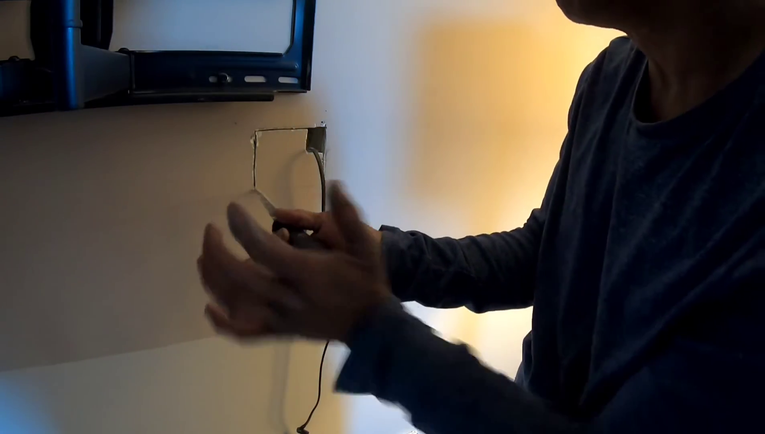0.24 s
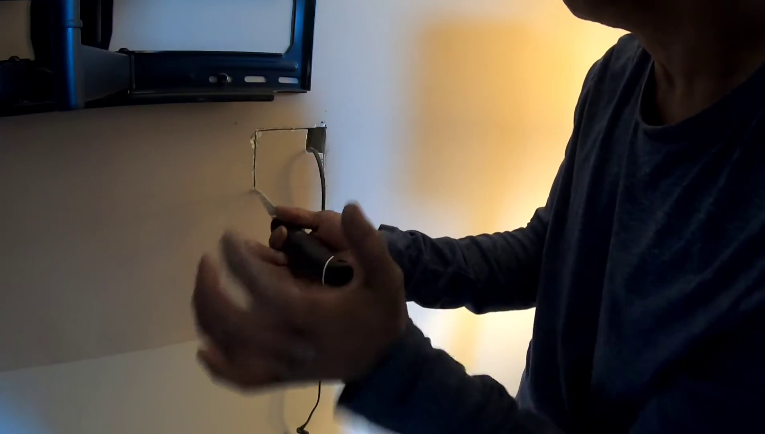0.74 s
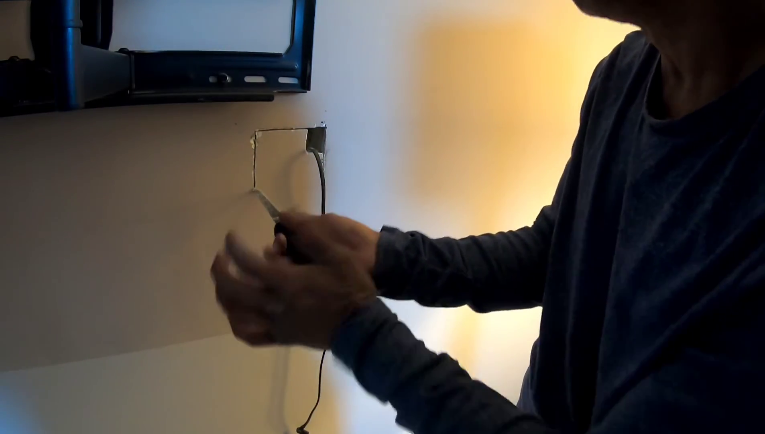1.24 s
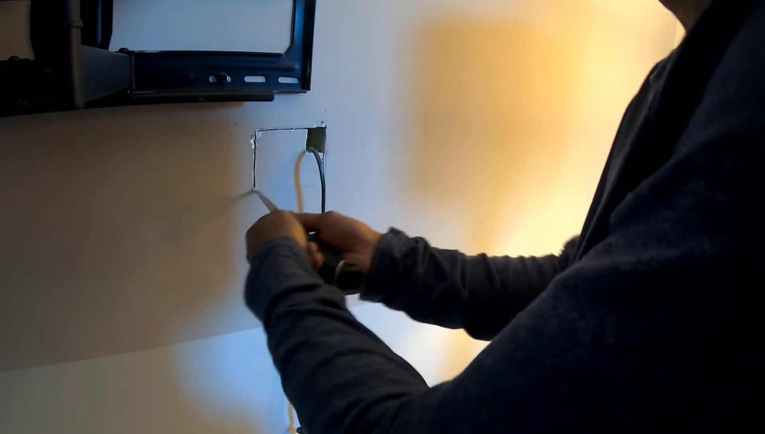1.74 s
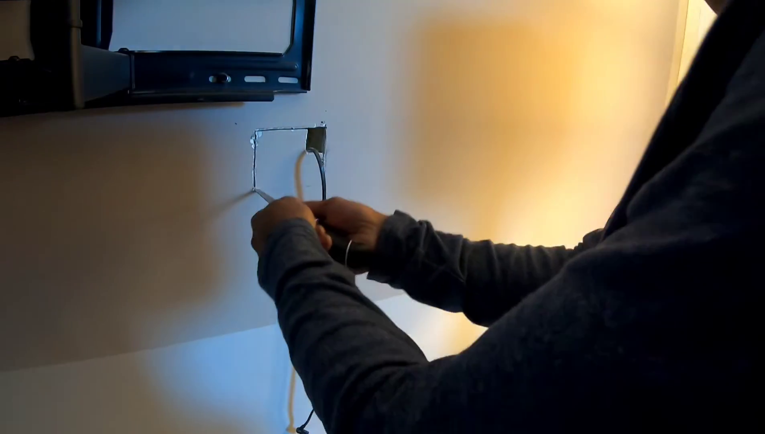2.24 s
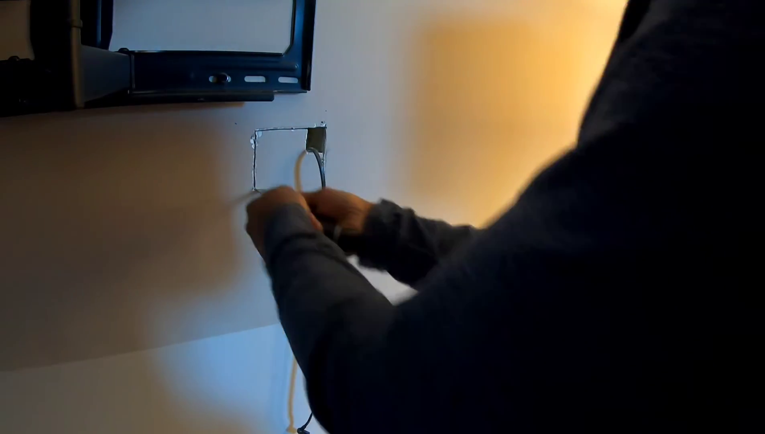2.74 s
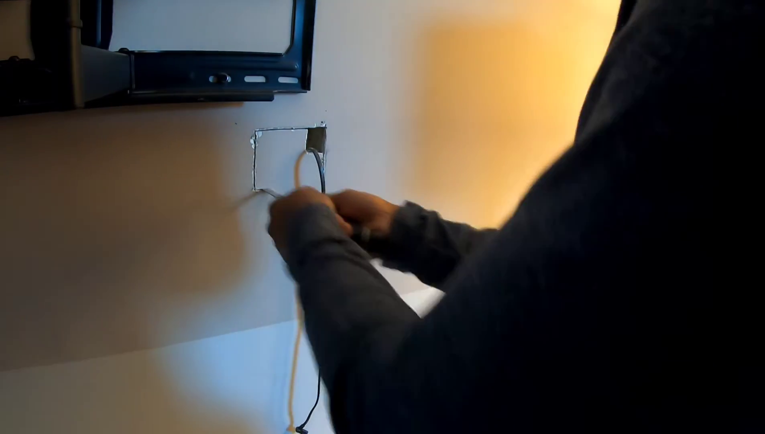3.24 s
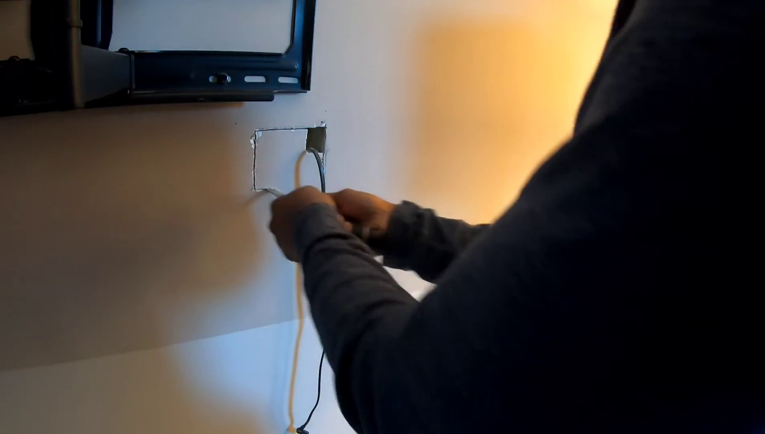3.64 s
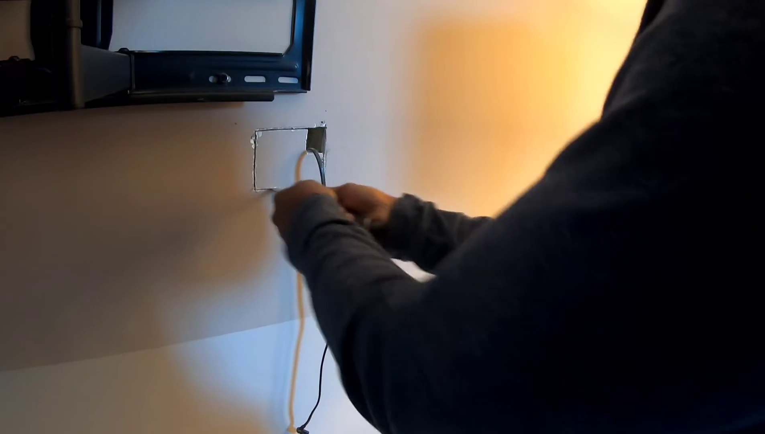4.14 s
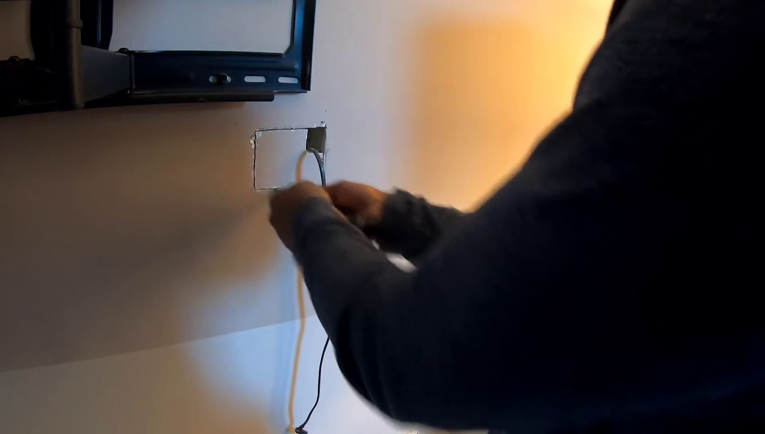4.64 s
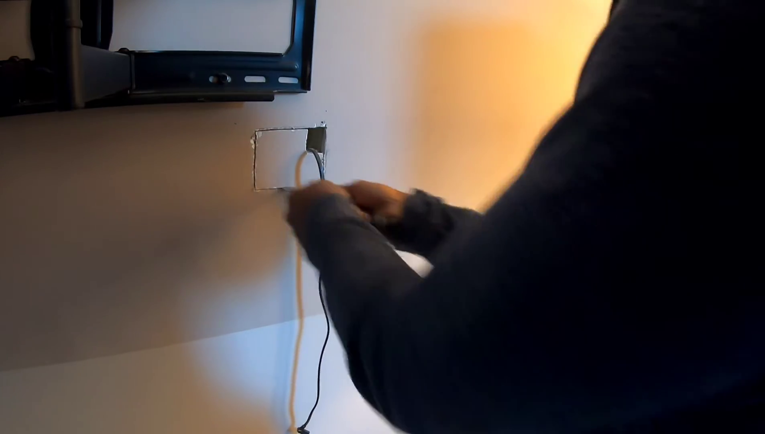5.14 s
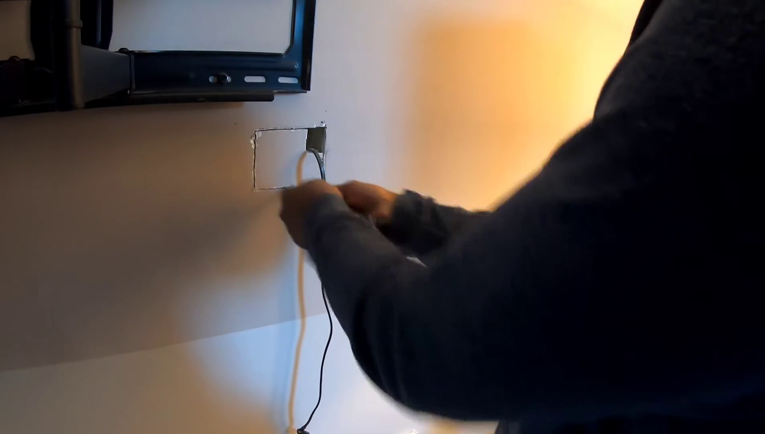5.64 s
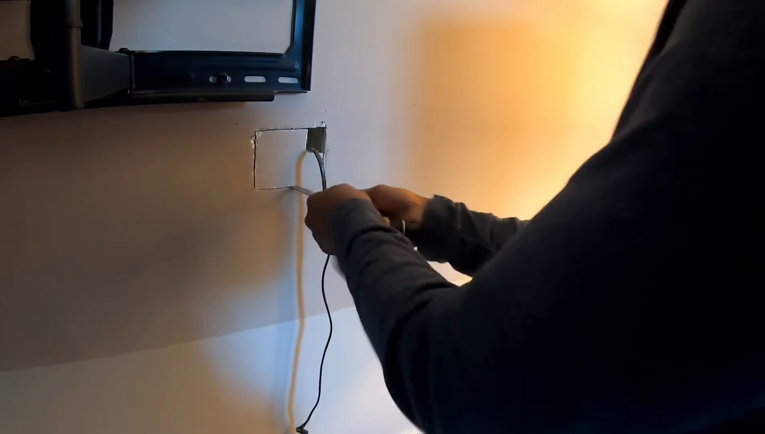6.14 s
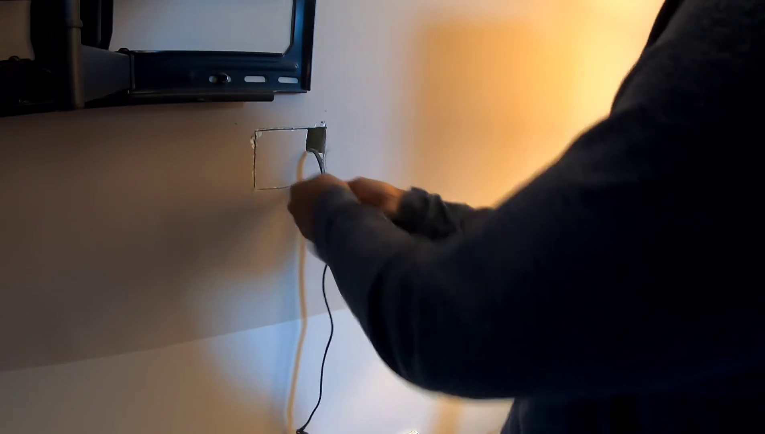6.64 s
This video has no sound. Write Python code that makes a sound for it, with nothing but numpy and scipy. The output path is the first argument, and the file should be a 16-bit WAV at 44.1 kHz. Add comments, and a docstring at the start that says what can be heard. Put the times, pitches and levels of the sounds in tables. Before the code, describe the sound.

Close stereo pickup of drywall being cut indoors. Weighty, spaced knocks drive the blade in, each shaking the panel with a low wobble. Cloth slides softly as the grip changes, then teeth catch in jerks and settle into quick alternating pull and push strokes. Hollow low drone pulses under gypsum crunch, scratchy rasp, faint steel ringing and fine dusty hiss, over quiet house rumble.

```python
"""Small hard room: a jab saw is knocked through drywall by palm blows, then sawn about six strokes a second.
Blows and snags excite decaying wall modes; the panel sways and rattles after each blow.
Teeth drive the hollow wall at their passing rate and gate filtered clicks: gypsum, rasp and dust.
Gliding resonances near 3 kHz ring the steel blade; a sleeve slides over faint house noise and rumble.
Sparse decaying echoes form the room, heard by a close two-port microphone."""
import sys
import numpy as np
from scipy import signal
from scipy.fft import rfft, irfft
from scipy.io import wavfile
from scipy.ndimage import uniform_filter1d

SR = 44100
rng = np.random.default_rng(int(sys.argv[2]) if len(sys.argv) > 2 else 0)


def store_pcm(level_fs):
    """Save levels as 16-bit WAV."""
    pcm = np.round(np.clip(level_fs, -1, 1) * 32767).astype(np.int16)
    wavfile.write(sys.argv[1], SR, np.atleast_2d(pcm).T)


N = 304304
TIME_S = np.arange(N) / SR

# Levels are relative: the layers apply further gains.
# palm blows: t/s, thud level/dB, crack level/dB, panel sway level/dB, crack 1/e decay/s
PALM_BLOWS = [(-0.14, -16, -38, -8, .010), (0.115, -15.5, -34, -1.5, 0.014), (0.365, -16, -35, -3, 0.013),
              (0.637, -9.5, -25, -3, 0.0085), (0.943, -9.5, -19, -5, .011),
              (1.202, -10.5, -23.5, -10.5, 0.016)]
# strokes, pull and push in turn, each lasting until the next: t/s, force level/dB
SAW_STROKES = [(1.809, -47), (1.98, -49.5), (2.129, -64), (2.202, -38.5), (2.358, -44.5), (2.442, -33.5),
               (2.629, -40.5), (2.781, -36), (2.941, -42.5), (3.095, -39.5), (3.251, -44), (3.382, -37),
               (3.56, -45.5), (3.704, -41.5), (3.876, -43), (4.014, -42.5), (4.185, -45.5), (4.334, -36.5),
               (4.5, -47), (4.652, -40.5), (4.833, -44.5), (4.987, -40), (5.151, -43), (5.308, -42),
               (5.479, -44), (5.631, -41), (5.802, -46.5), (5.961, -42), (6.134, -46.5), (6.281, -41),
               (6.458, -45.5), (6.604, -39), (6.791, -43.5)]
# a tooth snags hard and jerks the panel: t/s, level/dB
TOOTH_SNAGS = [(1.707, -32), (1.877, -17), (2.025, -11.5), (2.098, -19), (2.269, -11.5), (2.67, -12),
               (2.72, -8), (2.822, -13), (3.021, -8), (3.177, -10), (3.324, -8), (3.59, -14.5), (3.797, -7),
               (3.958, -9.5), (4.041, -12), (4.123, -5.5), (4.292, -14), (4.569, -17), (6.231, -11)]
# short clicks and crunches of blow, blade and cut: t/s, level/dB, spectral peak f/Hz
SHORT_CLICKS = [(0.116, -29.5, 735), (0.366, -31, 780), (0.799, -56, 7000), (1.338, -44, 8200),
                (1.511, -40.5, 2000), (2.018, -20, 680), (2.075, -31.5, 4900), (2.223, -28, 1530),
                (2.545, -17.5, 2960), (2.563, -19, 2500), (2.897, -20, 1240), (3.165, -22, 1710),
                (3.467, -12, 597), (3.499, -38, 5000), (3.726, -25.5, 906.5), (4.716, -22, 800),
                (6.031, -14.5, 437), (6.237, -18.5, 443), (6.699, -28, 393)]
# sleeve slides as the hand takes the grip: t/s, level/dB
SLEEVE_LEVEL = [(1.25, -66), (1.42, -59), (1.55, -57), (1.70, -63.5), (1.78, -58.5), (1.95, -54),
                (2.1, -79)]
# blade pitch drifts with its free length: t/s, factor on mode frequencies
BLADE_DRIFT = [(0.9, 0.87), (1.3, 1.02), (1.8, 1.1), (3.5, 1.08), (4.3, 0.92), (5.0, 0.94), (6.9, 0.89)]
# blade modes before drift, some damped by the board: f/Hz, width/Hz, level/dB
BLADE_MODES = [(1274, 28, -1), (2095, 13, 2.5), (2654, 180, -3), (2917, 14, 11.5), (2830, 350, -14.5),
               (3121, 21, 9.5), (3180, 850, -10.5), (3517, 20, 8), (5400, 630, -20)]
# hollow-wall modes: f/Hz, t60/s, level/dB
WALL_MODES = [(87.5, 0.12, -3), (125.7, 0.079, 4.5), (152.6, 0.058, 3), (185.7, 0.23, -11.5),
              (248.3, 0.3, -30), (311, 0.44, -36.5), (519, 0.27, -35.5)]
# slow, beating modes of the whole panel: f/Hz, t60/s, level/dB
PANEL_MODES = [(27.99, 0.81, -11), (32.55, 0.37, 2), (49.84, 0.47, -10)]
# unevenness of the cut: t/s, factor
RAGGEDNESS = [(1.8, 1.1), (4.2, 1.1), (4.7, .7), (5.9, .6), (6.9, .85)]
# deep rumble: t/s, level/dB
RUMBLE_LEVEL = [(0, -36), (1.3, -35.5), (1.75, -51), (2.2, -35), (3.3, -29), (4.9, -32.5), (5.8, -38),
                (6.9, -29.5)]
# boom level over rasp, uneven at first, strongest near 5.8 s: t/s, level/dB
BOOM_OVER_RASP = [(1.85, -15), (2.05, 20.5), (2.25, -2.5), (2.55, 13), (3.15, 14.5), (3.45, 15.5),
                  (4.2, 16.5), (5.2, 20.5), (5.8, 24), (6.9, 18)]
# base tooth rate, lower at the end as the arm tires; scaled by stroke and speed: t/s, f/Hz
TOOTH_PACE = [(1.8, 129.2), (3.7, 134.2), (5.7, 135), (6.15, 117), (6.9, 117)]

# spectra of gypsum crunching, teeth rasping and fine dust: f/Hz, level/dB
CRUNCH_SPECTRUM = [(20, -44), (120, -15), (235, 0.5), (275, -4.5), (322, 3), (365, -5.5), (450, -0.5),
                   (520, -10.5), (567, -6), (630, -10.5), (780, -14.5), (1050, -42.5), (2000, -66.5)]
RASP_SPECTRUM = [(500, -30.5), (900, 12), (1080, -3), (1260, 3.5), (1700, 0.5), (2300, 0.5), (3400, -1),
                 (4200, -8.5), (5500, -11.5), (7000, -45), (12000, -58.5)]
DUST_SPECTRUM = [(2500, 1), (4500, 6.5), (5700, 0), (7000, 0), (8200, -5.5), (9800, -3.5), (11200, -15.5),
                 (12300, -14), (14500, -27.5)]
# spectra of gypsum cracking and panel rattling: f/Hz, level/dB
CRACK_SPECTRUM = [(100, 1.5), (250, 19), (450, 11.5), (800, 3), (1200, -2.5), (2400, -4.5), (3400, -2),
                  (4300, -9.5), (5600, -11.5), (7500, -20.5), (10000, -25.5), (14000, -45)]
RATTLE_SPECTRUM = [(100, -10), (240, 1), (330, -6.5), (500, -18.5), (850, -19), (1200, -26.5), (3000, -40),
                   (6000, -45.5), (12000, -68.5)]
# spectra of cloth and of the house noise: f/Hz, level/dB
CLOTH_SPECTRUM = [(100, 8), (400, 13), (1000, -2), (2500, -7.5), (4100, 1), (5500, -8.5), (10000, -14.5),
                  (12000, -15.5), (15000, -31.5)]
AIR_SPECTRUM = [(15, -15.5), (32, 7.5), (60, -1), (140, -8), (250, -8.5), (800, -50.5), (3000, -30.5),
                (6000, -53.5), (14000, -90.5)]
# spectrum of the rumble: f/Hz, level/dB
RUMBLE_SPECTRUM = [(10, -15.5), (27, 1), (48, -6.0), (70, -8.5), (120, -42), (400, -80.0)]

# room decay: f/Hz, t60/s
ROOM_DECAY = [(60, 1), (160, 0.55), (420, 0.42), (1100, 1), (3000, 0.8), (6000, 0.7), (12000, 0.9)]
# room tail: f/Hz, level/dB
ROOM_LEVEL = [(60, -6.5), (140, 0), (300, -10.5), (1000, -6.5), (3000, -8), (6000, -8.5), (12000, -10.5)]
# difference between ports: f/Hz, level/dB
PORT_DIFFERENCE = [(30, -5.5), (60, -10), (140, -20), (320, -14.5), (490, -5), (750, 2), (1140, 5),
                   (1740, -1), (2650, -2), (4030, -2), (6150, 6), (12000, 4.5)]

LAST_STOP_S = 6.95
# share of a stroke spent gathering speed; pulls start as jerks and ease with time
PUSH_RISE, PULL_RISE, PULL_EASING_PER_S = 0.5094, 0.29, 0.077
# a pull is slower; each stroke sets off below its pace, so the boom glides up
PULL_SPEED, SET_OFF_SLOWER, SET_OFF_S = 0.96, 0.3, 0.05
# level over the rasp and its slope: as the boom rises, crunch rises and dust falls slightly
CRUNCH_DB, CRUNCH_DB_PER_BOOM_DB = 6.5, 0.19
DUST_DB, DUST_DB_PER_BOOM_DB = -8, -0.086
# light chance snags; level over the rasp before the raggedness factor
CATCHES_PER_S, CATCH_DB = 12, 19.5
# sliding in the cut and flexing smear the ring: shares of mode frequency
BLADE_SLIDE, BLADE_FLEX, FLEX_HZ = 0.008, 0.007, 25
BAND_EDGE_HZ = 14600


def gain_of(db):
    """Decibels to amplitude."""
    return 10 ** (np.asarray(db) / 20)


def rms(x):
    """Root mean square."""
    return np.sqrt(np.mean(x ** 2) + 1e-20)


def evened(x):
    """Scales to rms 1."""
    return x / rms(x)


def track(points):
    """Interpolates (t/s, value) points over the whole scene."""
    return np.interp(TIME_S, *np.transpose(points))


def read(points, hz):
    """Reads a spectrum on a log-frequency axis."""
    f_hz, value = np.transpose(points)
    return np.interp(np.log(hz + 1), np.log(f_hz + 1), value)


def add(mix, start_s, sound):
    """Mixes a sound in, trimming what lies outside the scene."""
    at = round(start_s * SR)
    part, sound = mix[max(at, 0):], sound[max(-at, 0):]
    part[:len(sound)] += sound[:len(part)]


def colour(x, points, size=4096):
    """Causal minimum-phase filter of unit energy; white noise keeps its power."""
    hz = abs(np.fft.fftfreq(size, 1 / SR))
    log_gain = np.log(gain_of(read(points, hz)))
    response = np.exp(np.conj(signal.hilbert(log_gain)))
    taps = np.fft.ifft(response).real
    return signal.oaconvolve(x, taps / np.linalg.norm(taps))[:len(x)]


def wander(hz):
    """Slow chance fluctuation of rms 1, up to about hz."""
    f_hz = np.fft.rfftfreq(N, 1 / SR)
    spectrum = rfft(rng.standard_normal(N)) * np.exp(-(f_hz / hz) ** 2)
    return evened(irfft(spectrum, N))


def grains(per_s, spread_db):
    """Random-sign clicks of very unequal size, as from gypsum crystals breaking; rms 1."""
    size = gain_of(spread_db * np.minimum(rng.exponential(1, N), 4))
    sign = rng.choice([-1, 1], N)
    return evened(size * sign * (rng.random(N) < per_s / SR))


def air():
    """Faint noise of the house: filtered white noise."""
    return gain_of(-50) * colour(rng.standard_normal(N), AIR_SPECTRUM)


def rumble():
    """Deep filtered noise, partly shared by the two ports."""
    shared, left, right = (colour(rng.standard_normal(N), RUMBLE_SPECTRUM) for _ in range(3))
    level = gain_of(track(RUMBLE_LEVEL))
    return level * (0.93 * shared + 0.79 * np.array([left, right]))


def blade_tuning():
    """Factor on blade modes: slow drift, a swing with every stroke and quick flexing."""
    start_s = np.transpose(SAW_STROKES)[0]
    depth = np.interp(TIME_S, start_s, (-1.) ** np.arange(len(start_s)))
    slide = BLADE_SLIDE * depth * (TIME_S > start_s[0])
    return track(BLADE_DRIFT) * (1 + slide + BLADE_FLEX * wander(FLEX_HZ))


def blade(x, ring_db):
    """Adds the blade's gliding resonances to the clicks that strike it."""
    tuning, out = blade_tuning(), x
    for hz, width_hz, db in BLADE_MODES:
        # shift the mode to 0 Hz, low-pass, shift back
        turn = np.exp(2j * np.pi * np.cumsum(hz * tuning) / SR)
        pole = np.exp(-np.pi * width_hz / SR)
        envelope = signal.lfilter([1 - pole], [1, -pole], x / turn + 1e-18)
        out = out + 2 * gain_of(db + ring_db) * (turn * envelope).real
    return out


def wall(force):
    """Modes start in alternating phase, so the boom swells for a cycle; a unit click peaks at 1."""
    t = TIME_S[:SR // 2]
    ring = np.zeros(len(t))
    for k, (hz, t60_s, db) in enumerate(WALL_MODES):
        ring += (-1) ** k * gain_of(db - 60 * t / t60_s) * np.sin(2 * np.pi * hz * t)
    return signal.oaconvolve(force, ring / abs(ring).max())[:N]


def blows():
    """The tip crushes gypsum, the wall thuds, then the whole panel sways and rattles."""
    push, crush, sway, shake = np.zeros((4, N))
    t = TIME_S[:SR]
    swing = sum(gain_of(db - 60 * t / t60_s) * np.sin(2 * np.pi * hz * t) for hz, t60_s, db in PANEL_MODES)
    build_up = 1 - np.exp(-(t / 0.061) ** 2)
    for s, thud_db, crack_db, sway_db, decay_s in PALM_BLOWS:
        add(push, s - 0.005, gain_of([thud_db + 1]))
        # the palm meets the handle first
        add(crush, s - 0.007, gain_of(crack_db - 17.5) * np.exp(-t / 0.033))
        add(crush, s, gain_of(crack_db + 2.5) * (1 - np.exp(-t / 0.0038)) * np.exp(-t / decay_s))
        add(sway, s, -gain_of(sway_db - 1) * build_up * swing)
        add(shake, s, gain_of(sway_db - 60 * t / 0.59) * build_up)
    crack = blade(colour(crush * grains(9000, 0.85), CRACK_SPECTRUM), ring_db=-2)
    rattle = gain_of(-27) * colour(shake * grains(2500, 2.5), RATTLE_SPECTRUM)
    return wall(push) + crack + sway + rattle


def short_clicks():
    """Clicks and crunches of blow, blade and cut: decaying noise bursts, each with a spectral peak."""
    clicks = np.zeros(N)
    t = TIME_S[:SR // 20]
    for s, db, hz in SHORT_CLICKS:
        burst = rng.standard_normal(len(t)) * np.exp(-t / 0.017)
        peak = [(hz / 5, -12), (hz, 0), (hz * 1.34, -10), (hz * 4, -30), (hz * 30, -75)]
        add(clicks, s, gain_of(db) * colour(burst, peak))
    return gain_of(-12.5) * clicks


def sleeve():
    """Sliding cloth: dense filtered clicks of wavering level."""
    level_db = np.interp(TIME_S, *np.transpose(SLEEVE_LEVEL), left=-120, right=-120)
    level_db = level_db + 1.5 * wander(25)
    return colour(gain_of(level_db) * grains(16000, 1.5), CLOTH_SPECTRUM)


def stroke_motion(rest, sharpness):
    """Blade speed, level in each layer and tooth rate; the blade slows at every turn."""
    start_s, force_db = np.transpose(SAW_STROKES)
    pull = np.arange(len(start_s)) % 2 == 0
    pull_rise = PULL_RISE + PULL_EASING_PER_S * (start_s - start_s[0])
    rise = np.clip(np.where(pull, pull_rise, PUSH_RISE), 0.1, 0.9)
    fastest_s = start_s + rise * np.diff(start_s, append=LAST_STOP_S)
    knots_s = np.sort(np.r_[start_s, fastest_s, LAST_STOP_S])
    half_turns = np.interp(TIME_S, knots_s, np.arange(len(knots_s)) / 2)
    speed = abs(np.sin(np.pi * half_turns))

    which = np.maximum(np.searchsorted(start_s, TIME_S) - 1, 0)
    set_off = 1 - SET_OFF_SLOWER * np.exp(-((TIME_S - start_s[which]) / SET_OFF_S) ** 2)
    pace_hz = track(TOOTH_PACE) * np.where(pull, PULL_SPEED, 1)[which] * set_off
    rasp_db = uniform_filter1d(force_db[which], size=1200)
    tooth_hz = uniform_filter1d(pace_hz, size=1200)

    boom_db = track(BOOM_OVER_RASP)
    dust_db = DUST_DB + DUST_DB_PER_BOOM_DB * boom_db
    crunch_db = CRUNCH_DB + CRUNCH_DB_PER_BOOM_DB * boom_db
    fade_in = np.clip((TIME_S - start_s[0]) / 0.043, 0, 1)
    bite = (rest + (1 - rest) * speed ** sharpness) * fade_in
    levels = [bite * gain_of(rasp_db + over_db) for over_db in (0, dust_db, crunch_db, boom_db)]
    return speed, levels, tooth_hz


def catches():
    """Light snags at random moments, stronger with stroke force and raggedness."""
    rasp = stroke_motion(rest=0.49, sharpness=0.98)[1][0]
    hits = rng.random(N) < CATCHES_PER_S / SR
    return gain_of(CATCH_DB) * rasp * track(RAGGEDNESS) ** 2 * hits


def snags():
    """A snag jerks the panel into its modes and crumbles the edge of the cut."""
    jerks = catches()
    t = TIME_S[:SR // 20]
    for s, db in TOOTH_SNAGS:
        add(jerks, s - 0.007, gain_of([db]))
    crumble_shape = (1 - np.exp(-t / 0.0069)) * np.exp(-t / 0.018)
    crumble = signal.oaconvolve(jerks, crumble_shape)[:N]
    crumbs = colour(crumble * grains(3300, 1), CRACK_SPECTRUM)
    return gain_of(-1) * wall(jerks) + gain_of(-20) * crumbs


def sawing():
    """Teeth drag over the edge of the cut, rocking the wall at their own rate and tearing off grains."""
    speed, (rasp, dust, crunch, boom), tooth_hz = stroke_motion(rest=0.11, sharpness=1.36)
    ragged = track(RAGGEDNESS)
    jitter = 1 + 0.09 * ragged * wander(58)
    teeth = np.cumsum(tooth_hz * (0.85 + 0.17 * speed) * jitter) / SR
    hardness_db = ragged * wander(62)  # gypsum is uneven

    drag = np.sin(2 * np.pi * teeth) * gain_of(3 * hardness_db + 1.6 * ragged * wander(70))
    tooth_clicks = np.diff(np.floor(teeth), prepend=0)
    strikes = evened(tooth_clicks * gain_of(2 * hardness_db + 2 * wander(130)))
    tearing = evened((3.6 + np.exp(-(teeth % 1) / 0.39)) * gain_of(1.7 * hardness_db))

    rocking = boom * (0.3 + 0.7 * speed)  # weakest at each turn
    ringing = gain_of(-11) * rms(boom) * evened(wall(strikes * rocking))
    booming = gain_of(7.5) * (rocking * evened(drag) + ringing)

    crushing = crunch * (0.53 + 0.5 * speed)  # crunch grows louder with blade speed
    breaking = 0.5 * strikes + 1.14 * tearing * grains(2000, 2.1)
    crunching = colour(crushing * breaking, CRUNCH_SPECTRUM)

    scraping = colour(rasp * tearing * grains(3000, 3.5), RASP_SPECTRUM)
    rasping = evened(blade(scraping, ring_db=6.5)) * rms(rasp)
    hissing = colour(dust * tearing * grains(9000, 0.55), DUST_SPECTRUM)
    return booming + gain_of(-0.37) * crunching + gain_of(-0.54) * rasping + gain_of(1.07) * hissing


def reflections():
    """Sparse echoes of random sign, each band dying at its own speed."""
    t = TIME_S[:SR * 3 // 4]
    taps = rng.choice([-1., 1.], len(t)) * (rng.random(len(t)) < 3000 / SR) * (t > 0.004)
    hz, at_s, bands = signal.stft(taps, SR, nperseg=256)
    t60_s = read(ROOM_DECAY, hz)[:, None]
    decay = gain_of(read(ROOM_LEVEL, hz)[:, None] - 60 * at_s / t60_s)
    tail = signal.istft(bands * decay / np.sqrt(t60_s), SR, nperseg=256)[1]
    return tail * np.sqrt(2 * np.log(1000) / np.sum(taps ** 2) * t[-1])


def scene():
    """Direct sound and room; ports differ through nearby surfaces and their own share of echoes."""
    direct = air() + blows() + short_clicks() + sleeve() + snags() + sawing()
    mid = direct + signal.oaconvolve(direct, reflections())[:N]
    t = TIME_S[:SR // 50]
    near = rng.standard_normal(len(t)) * np.exp(-t / 0.003)
    near_sound = signal.oaconvolve(direct, near / np.linalg.norm(near))[:N]
    apart = near_sound / 2 + 0.74 * signal.oaconvolve(direct, reflections())[:N]
    side_gain = gain_of(read(PORT_DIFFERENCE, np.fft.rfftfreq(2 * N, 1 / SR)))
    side = irfft(rfft(apart, 2 * N) * side_gain)[:N]
    return np.array([mid + side, mid - side]) * gain_of([[-0.4], [0.4]]) + rumble()


def record(dry):
    """Microphone: drops the deepest bass, rounds off the loudest peaks, then limits the band."""
    ceiling = 0.58
    high_pass = signal.butter(1, 10, "high", fs=SR, output="sos")
    dry = signal.sosfilt(high_pass, dry)
    rounded = dry / (1 + (dry / ceiling) ** 4) ** (1 / 4)
    low_pass = signal.firwin(511, BAND_EDGE_HZ, window=("kaiser", 9), fs=SR)
    return signal.oaconvolve(rounded, low_pass[None], "same")


dry = scene()
out = record(dry)
store_pcm(out)
```